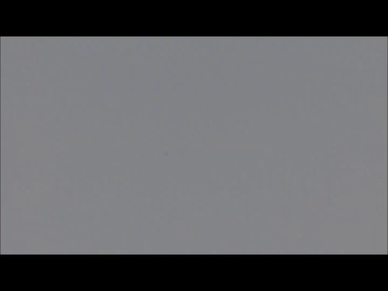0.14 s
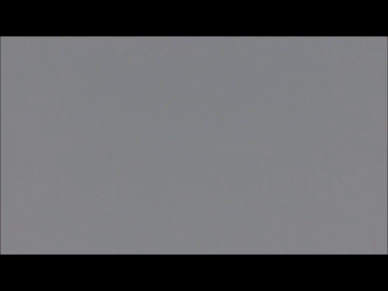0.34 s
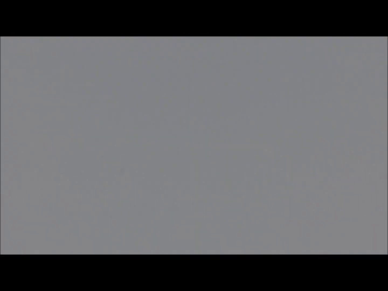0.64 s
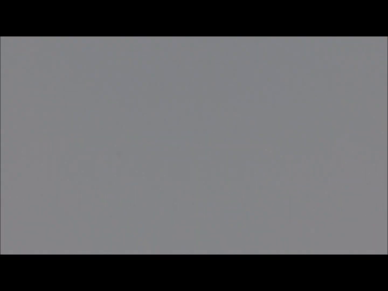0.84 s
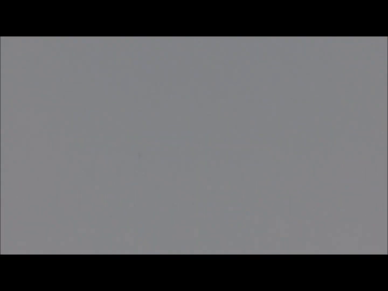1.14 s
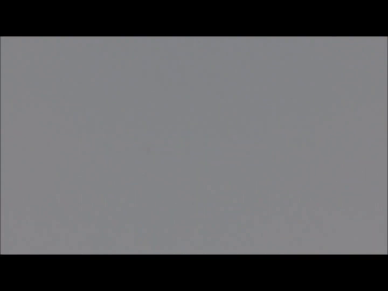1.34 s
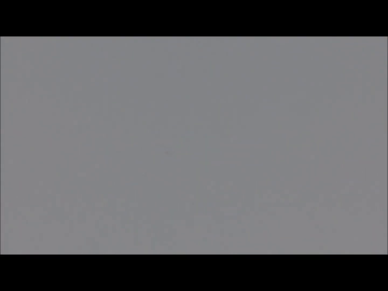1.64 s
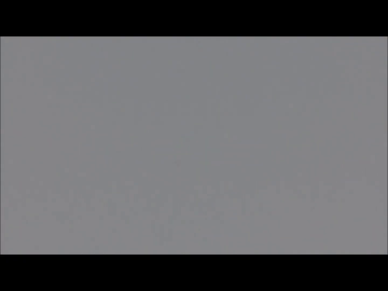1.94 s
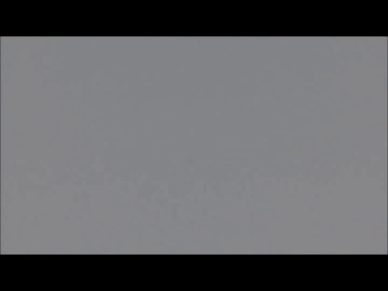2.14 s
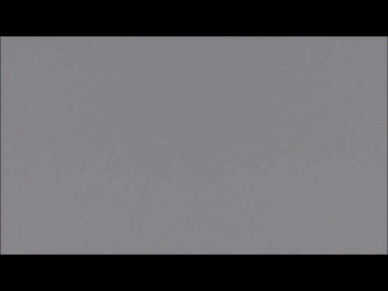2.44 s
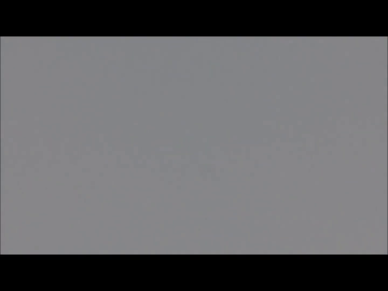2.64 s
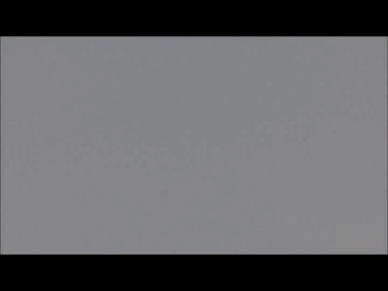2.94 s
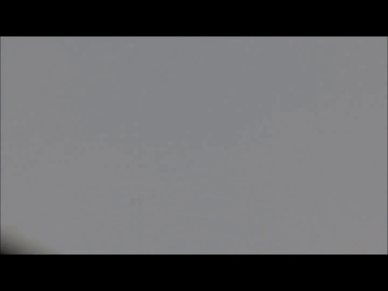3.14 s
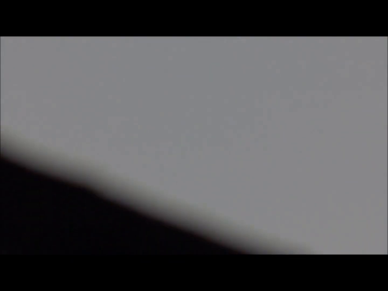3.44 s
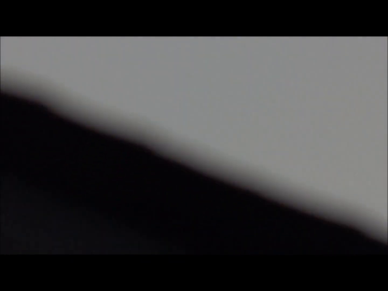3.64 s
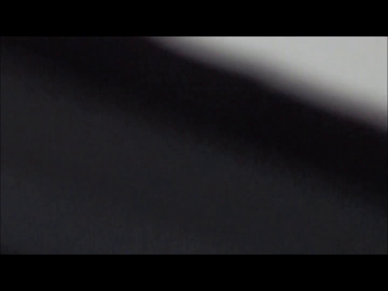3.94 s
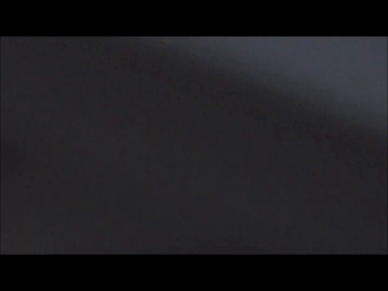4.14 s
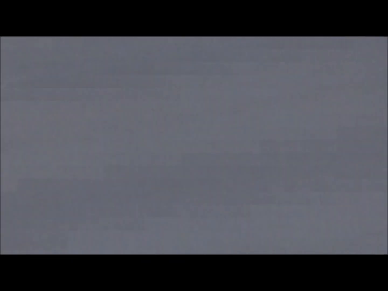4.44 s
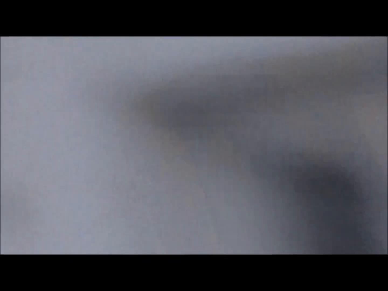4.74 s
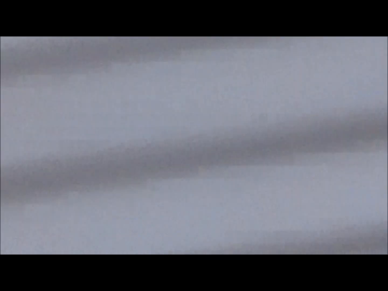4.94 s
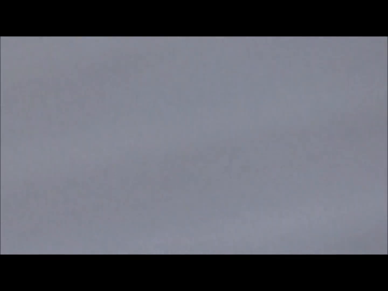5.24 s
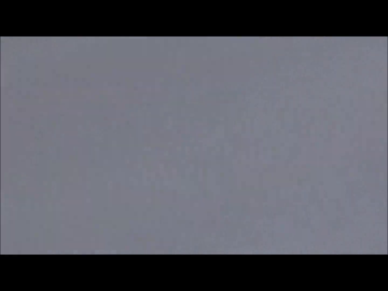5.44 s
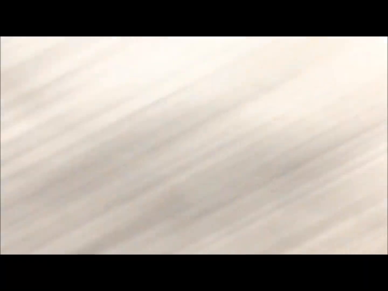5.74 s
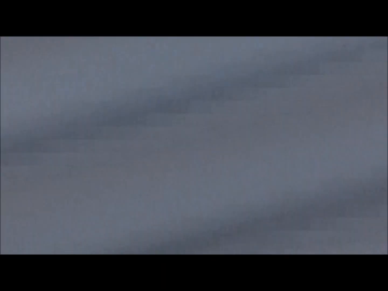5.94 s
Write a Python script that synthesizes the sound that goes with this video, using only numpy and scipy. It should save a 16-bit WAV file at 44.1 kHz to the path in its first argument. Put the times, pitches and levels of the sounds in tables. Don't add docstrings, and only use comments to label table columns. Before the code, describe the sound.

A close hand-held stereo microphone in open air picks up a strong wind gust and a smooth, wavering engine drone that gradually climbs with broad road noise. The roar brightens just before the engine suddenly drops out. Immediately the plastic casing cracks loudly, is knocked and rubbed by fingers; sparser clicks and dry scrapes continue over subdued rumble, a faint low hum and a slight closing gust.

```python
import sys
import numpy as np
from scipy import signal
from scipy.fft import rfft, irfft, next_fast_len
from scipy.io import wavfile

SR = 44100
rng = np.random.default_rng(int(sys.argv[2]) if len(sys.argv) > 2 else 0)


def output_pcm(signal):
    pcm = np.clip(np.atleast_2d(signal).T, -1, 1) * 32767
    wavfile.write(sys.argv[1], SR, np.round(pcm).astype(np.int16))


def attenuation_scalar(level_db):
    decades = np.asarray(level_db, float) / 20
    return 10 ** decades


N = 267863

# (frequency [Hz], likeness [0-1])
ROAD_LIKENESS = [(60, .99), (130, .97), (290, .88), (640, .66), (1410, .68), (3100, .8), (6820, .8),
                 (9500, .85), (11000, 1.0), (16000, 1.0)]


def rms_one(x):
    return x / np.sqrt(np.mean(x ** 2) + 1e-20)


def in_time(rows):
    s, *columns = np.transpose(rows)
    return [np.interp(np.arange(N) / SR, s, column) for column in columns]


def at_hz(points, hz):
    table_hz, values = np.array(points).T
    return np.interp(np.log(hz), np.log(table_hz + 1), values)


def swells(rows):
    t = np.arange(0, N + 40, 40) / SR
    total_db = sum(db * np.exp(-((t - s) / half) ** 2) for s, db, half in rows)
    return np.interp(np.arange(N) / SR, t, total_db)


def drift(rate):
    r = np.exp(-80 * np.pi * rate / SR)
    slow = signal.lfilter([1], [1, -2 * r, r * r], rng.standard_normal(N // 40 + 2002))[2000:]
    return np.interp(np.arange(N) / 40, np.arange(len(slow)), rms_one(slow))


def low_pass(x, hz):
    return signal.sosfilt(signal.butter(2, hz, fs=SR, output="sos"), x)


def ring(x, hz, t60):
    r, w = attenuation_scalar(-60 / (t60 * SR)), 2 * np.pi * hz / SR
    return signal.lfilter([0, np.sin(w)], [1, -2 * r * np.cos(w), r * r], x + 1e-18)


def resonant(x, bands, wander_db, lift_db=0):
    out = x
    for hz, t60, db in bands:
        gain = attenuation_scalar(db + lift_db + wander_db * drift(6.5))
        out = out + gain * rms_one(ring(ring(x, hz, t60), hz, t60))
    return out


def stereo(mid, side, alike):
    return np.sqrt(1 + alike) * mid + np.sqrt(1 - alike) * side * [[1], [-1]]


def banded_noise(spectrum, likeness, patchy_db, flicker):
    out, together = 0, drift(7.7)
    lowest, highest = spectrum[0][0], spectrum[-1][0]
    edges = lowest * 2 ** np.arange(0, np.log2(highest / lowest) + .3, 1 / 3)
    white = rng.standard_normal((2, 2, N))
    for k, (low, high) in enumerate(zip(edges, edges[1:])):
        hz = np.sqrt(low * high)
        level_db = at_hz(spectrum, hz)
        if level_db < -50:
            continue
        band = signal.butter(2, [low, high], "band", fs=SR, output="sos")
        mid, side = signal.sosfilt(band, white[k % 2])
        alike = np.clip(at_hz(likeness, hz), -1, 1)
        gain = attenuation_scalar(level_db + patchy_db * (.5 * together + drift(flicker)))
        out = out + gain * stereo(mid, side, alike)
    return rms_one(out)


def self_noise():
    high = signal.butter(2, 7000, "high", fs=SR, output="sos")
    return attenuation_scalar(-66) * rms_one(signal.sosfilt(high, rng.standard_normal(N)))


def road_rumble(open_db):
    # (frequency [Hz], level [dB per Hz])
    rumble_spectrum = [(12, -65.5), (20, -35.5), (38, -17.5), (70, 0), (145, 4), (177, 0.5), (223, -4),
                       (248, -9.5), (382, -17), (500, -31), (650, -57.5), (1100, -120)]
    # (time [s], rise [dB], half length [s])
    gusts = [
        (0, 11.5, 0.21),
        (.78, 1.5, 0.071),
        (2.2, 1, 0.28),
        (4.42, 3, 0.099),
        (5.5, 1.5, 0.14),
        (6.07, 5, 0.58),
    ]
    level_db = -27 + 0.72 * open_db + swells(gusts)
    return attenuation_scalar(level_db) * banded_noise(rumble_spectrum, ROAD_LIKENESS, patchy_db=1.0, flicker=6.0)


def road_roar(open_db, puffs):
    # (frequency [Hz], level [dB per Hz])
    roar_spectrum = [(190, -43.5), (330, 1), (359, -23), (417, -3), (538, -10), (580, -15), (733, -8),
                     (1010, -5.5), (1300, -14.5), (1660, -12.5), (2600, -20), (3150, -29), (4200, -26.5),
                     (5460, -52), (9240, -120)]
    # (frequency [Hz], 60 dB decay [s], level [dB])
    body_bands = [(740, .025, -9), (1680, .01, -9.5), (3000, .008, -15)]
    # (time [s], rise [dB], half length [s])
    flank_faces = [
        (3.55, 4, .4),
    ]
    roar = banded_noise(roar_spectrum, ROAD_LIKENESS, patchy_db=.8, flicker=3.0)
    roar = resonant(roar, body_bands, wander_db=-0.5, lift_db=swells(flank_faces))
    return attenuation_scalar(-33 + open_db) * puffs * roar


def road_hiss(open_db):
    # (frequency [Hz], level [dB per Hz])
    hiss_spectrum = [(1760, -39), (3000, 1.5), (3520, -12), (3910, -5), (4470, -6.5), (5630, -14),
                     (6670, -7), (10400, -26.5), (14200, -27.5), (16000, -42)]
    # (time [s], change [dB], half length [s])
    aim = [
        (.1, -5.5, 0.5),
        (3.05, -3.5, 0.4),
        (6.07, 5, 0.25),
    ]
    level_db = -50.2 + 0.76 * open_db + swells(aim)
    return attenuation_scalar(level_db) * banded_noise(hiss_spectrum, ROAD_LIKENESS, patchy_db=.5, flicker=2.5)


def swish(path):
    hz, level_db = in_time(path)
    slow = low_pass(rng.standard_normal((3, N)), 400)
    turn = 2 * np.pi * np.cumsum(hz) / SR
    mid = slow[0] * np.cos(turn) + slow[1] * np.sin(turn)
    side = slow[2] * np.cos(turn)
    return attenuation_scalar(level_db + 1.5 * drift(5.0)) * rms_one(mid + 0.53 * side * [[1], [-1]])


def ground_reflections():
    # (time [s], centre [Hz], level [dB])
    high_path = [(0, 6500, -62), (.8, 6500, -63), (1.0, 8500, -75), (1.3, 8200, -61.5), (1.6, 7300, -62.5),
                 (2.4, 6300, -63), (3.0, 6400, -68), (3.3, 4600, -52.5), (3.7, 4500, -47.5),
                 (4.05, 4400, -56), (4.3, 4280, -58.5), (5.7, 5600, -60.5), (5.85, 6200, -58),
                 (6.07, 6700, -53.5)]
    # (time [s], centre [Hz], level [dB])
    low_path = [
        (0, 3307, -70),
        (1.0, 4484, -67),
        (1.4, 4620, -60),
        (2.4, 4200, -61.5),
        (3.0, 3190, -57.5),
        (3.45, 3110, -47.5),
        (3.9, 3160, -51.5),
        (4.1, 3160, -57),
        (4.3, 3000, -72),
        (6.07, 3000, -78),
    ]
    return swish(high_path) + swish(low_path)


def coasting():
    # (time [s], frequency [Hz], level [dB])
    hum = [
        (4.65, 73.9, -38),
        (4.69, 77, -42.5),
        (5.016, 73.1, -29),
        (5.056, 68.8, -38.5),
        (5.256, 67, -37.5),
        (5.414, 63.7, -46),
        (5.45, 64, -55.5),
    ]
    hz, level_db = in_time([(4.1, 79.3, -73.5), *hum, (5.55, 64.3, -60.5)])
    phase = 2 * np.pi * np.cumsum(hz) / SR + 0.49 * drift(19.0)
    return np.sqrt(2) * attenuation_scalar(level_db + 0.64 * drift(8.0)) * np.sin(phase)


def bumps():
    # (time [s], level [dB])
    jolts = [
        (0.005, -3),
        (4.098, -3.5),
        (4.94, -8),
        (5.487, -9.5),
    ]
    pushes = np.zeros(N)
    for s, db in jolts:
        pushes[round(s * SR)] = attenuation_scalar(db - 17)
    return signal.lfilter([.02], [1, -.98], ring(pushes, 35, .09))


def rubbing():
    # (frequency [Hz], level [dB per Hz])
    rub_spectrum = [(500, -0.5), (800, 6), (1500, -2.5), (2600, -1), (3500, -9.5), (4500, -9.5),
                    (5800, -23.5), (7000, -13), (9000, -16.5), (10500, -26), (12700, -20), (14200, -30),
                    (15500, -33.5)]
    # (frequency [Hz], likeness [0-1])
    rub_likeness = [(500, 0.65), (1500, 0.51), (6000, 0.84), (9000, 0.68), (10500, 1), (16000, 0.79)]
    # (frequency [Hz], 60 dB decay [s], level [dB])
    shell_bands = [(2600, .006, -12), (5800, .006, -13), (8000, .005, -17), (9100, .005, -17),
                   (12700, .003, -30)]
    # (time [s], rise [dB], half length [s])
    dry_finger = [
        (4.275, 7, .03),
        (4.335, 9, .03),
        (4.735, 2, .03),
        (5.83, 4, .1),
    ]
    # (start [s], stop [s], level at the stop [dB])
    strokes = [(4.075, 4.09, -44), (4.1, 4.125, -52), (4.94, 4.975, -51), (4.165, 4.185, -45),
               (4.19, 4.215, -43), (4.222, 4.24, -45), (4.255, 4.3, -47), (4.3, 4.353, -49),
               (4.555, 4.563, -50), (4.58, 4.63, -55), (4.7, 4.76, -51), (4.86, 4.93, -49),
               (4.93, 4.998, -46), (5.29, 5.36, -47), (5.485, 5.51, -43), (5.61, 5.67, -48),
               (5.69, 5.85, -56), (5.87, 5.96, -50), (5.97, 6.06, -56)]
    press_db, land_db_per_s, lift_db_per_s = 3, 550, 1000
    t = np.arange(N) / SR
    level = np.zeros(N)
    for start, stop, db in strokes:
        still_to_go = np.clip((stop - t) / (stop - start + 1e-3), 0, 1)
        landing_db = land_db_per_s * np.maximum(start - t, 0)
        lifting_db = lift_db_per_s * np.maximum(t - stop, 0)
        level += attenuation_scalar(db - press_db * still_to_go - landing_db - lifting_db)
    grains = attenuation_scalar(2.6 * drift(400.0) + .4 * drift(35.0))
    skin = banded_noise(rub_spectrum, rub_likeness, patchy_db=.9, flicker=6.0)
    skin = resonant(skin, shell_bands, wander_db=1.5, lift_db=swells(dry_finger))
    return level * attenuation_scalar(6.0) * grains * skin


def peak_one(x):
    return x / np.abs(x).max()


def palm_knocks():
    # (time [s], peak [dB], pitch [Hz])
    knocks = [(4.0751, -22.5, 1190), (4.0986, -20.5, 623), (4.1621, -17, 595), (4.1904, -21.5, 980),
              (4.2038, -10.5, 663), (4.2248, -20, 910), (4.2604, -20.5, 578), (4.2954, -20.5, 749),
              (4.5534, -23.5, 576), (4.5645, -12.5, 613), (4.5655, -23.5, 1103), (5.4861, -13, 837),
              (5.5962, -23, 910), (5.9372, -31, 825)]
    out, t = np.zeros((2, N + 2000)), np.arange(2000) / SR
    for s, db, hz in knocks:
        burst = rng.standard_normal(len(t)) * attenuation_scalar(-60 * t / 0.025)
        body = ring(burst, hz, .035) + .6 * ring(burst, 1.3 * hz, .02)
        knock = ring(body, 1.1 * hz, .006)
        i = round(s * SR)
        out[:, i:i + len(t)] += attenuation_scalar(db - 4.5) * peak_one(knock)
    return out[:, :N]


def shell_snaps():
    # (frequency [Hz], level [dB], 60 dB decay [s], left-right likeness [0-1])
    edge_modes = [(5900, 0, .003, .85), (7600, -1, .0025, .6), (9200, -6, .0025, .5),
                  (11500, -12, .002, 1.0), (13500, -22, .002, 1.0)]
    # (time [s], peak [dB], pitch [Hz], crack [dB], bright edge [dB])
    snaps = [(4.053, -40.5, 1716, -37.5, -30), (4.0739, -15.5, 1774, -21, -15.5),
             (4.0802, -17.5, 3000, -29.5, -30.5), (4.0993, -4, 2020, -14.5, -0.5),
             (4.109, -26, 1510, -21, -9.5), (4.1392, -17, 2380, -35, -41), (4.1492, -32, 2004, -40, -33),
             (4.1628, -24, 1690, -30.5, -23.5), (4.1669, -26, 2430, -26.5, -29),
             (4.1886, -26, 2580, -36, -19.5), (4.1903, -20, 2600, -34, -26), (4.1948, -26, 1800, -44, -25),
             (4.2046, -21, 1770, -37, -37), (4.2256, -19, 1590, -31.5, -30),
             (4.4363, -14, 2510, -27.5, -21.5), (4.5545, -35, 1533, -42, -28),
             (4.5647, -11, 1880, -30, -40), (4.6049, -26.5, 2000, -36, -29),
             (4.6521, -15.5, 2310, -19.5, -33), (5.2613, -17.5, 2100, -22, -21.5),
             (5.2802, -23.5, 2704, -38, -31), (5.2885, -13, 2480, -20, -7.5), (5.3163, -21, 2730, -34, -45),
             (5.336, -35, 1900, -36, -18.5), (5.3524, -29, 1920, -33, -39), (5.3658, -25, 2000, -27, -24.5),
             (5.408, -24, 2280, -32, -19.5), (5.4867, -14, 2620, -21.5, -30),
             (5.5969, -22.5, 2400, -27, -29.5), (5.618, -15.5, 2780, -22, -37),
             (5.7258, -15.5, 1670, -30, -19.5), (5.8221, -29.5, 1690, -42, -22),
             (5.9366, -19.5, 2690, -23, -24.5)]
    # (time [s], level [dB])
    creaks = [
        (4.2598, -41.5),
        (5.3278, -57),
        (5.469, -44.5),
        (5.55, -51),
        (5.7485, -49.5),
        (5.927, -50),
        (5.9737, -40),
    ]
    crack_hz, crack_t60 = 4200, 0.0014
    out, t = np.zeros((2, N + 2000)), np.arange(2000) / SR
    creak_rows = [(s, db + 9.5, 3000, db + 9.5, db + 13) for s, db in creaks]
    for s, snap_db, snap_hz, crack_db, edge_db in [*snaps, *creak_rows]:
        mid, side = 0.55 * rng.standard_normal((2, len(t))) * attenuation_scalar(-60 * t / 0.02)
        mid[0], side[0] = 2, 1.5
        crack = ring(mid, crack_hz, crack_t60) - .7 * ring(mid, .8 * crack_hz, crack_t60)
        snap = ring(mid, snap_hz, .0035) + .35 * ring(mid, .7 * snap_hz, .004)
        snap = low_pass(snap, 1.6 * snap_hz)
        edge = 0
        for hz, db, t60, alike in edge_modes:
            pair = stereo(mid, side, np.clip(alike, 0, 1)) * attenuation_scalar(-60 * t / .014)
            edge = edge + attenuation_scalar(db + rng.normal(0, 2)) * ring(pair, hz, t60)
        edge = edge - low_pass(edge, 4000)
        click = attenuation_scalar(snap_db) * peak_one(snap) + attenuation_scalar(crack_db) * peak_one(crack)
        i = round(s * SR)
        out[:, i:i + len(t)] += click + attenuation_scalar(edge_db) * peak_one(edge)
    return out[:, :N]


def exhaust():
    # (time [s], firing rate [Hz], load as level of the firing tone [dB])
    revs = [(0, 97.95, -15.5), (.16, 89.99, -15.5), (.36, 82.24, -20), (.8, 83.96, -23), (1.1, 87.6, -17),
            (1.6, 91.7, -15), (2.1, 96.24, -12.5), (2.7, 100.6, -11), (3.4, 106.8, -12), (3.98, 109.4, -11),
            (4.09, 111, -16), (4.13, 108.5, -29.5), (4.65, 106, -34.5), (5.03, 94.06, -43.5),
            (5.37, 92.16, -39), (5.71, 86.77, -31.5), (5.9, 86.63, -32.5), (6.07, 87.2, -36)]
    # (time [s], change [dB], half length [s])
    first_fades = [(.09, -15, 0.026), (.22, -2.5, 0.033), (.34, -10, 0.11), (.72, -3, 0.039),
                   (1.2, -2, .12), (1.385, -9.5, 0.068), (1.47, -6, 0.062), (1.78, -10, 0.11),
                   (1.95, -2.5, 0.058), (2.325, -11, 0.065), (2.5, -7, 0.077), (2.99, -4.5, 0.058),
                   (3.2, -6, 0.14), (3.25, -4.5, .03), (3.62, -7, 0.19), (4.69, -12, 0.13),
                   (5.37, -11, 0.064)]
    # (time [s], change [dB], half length [s])
    second_fades = [(0, -20, 0.034), (.08, -9.5, 0.042), (.135, -12, 0.023), (.33, -28, 0.1),
                    (.5, -10.5, 0.061), (.72, -4, 0.11), (.885, -28, 0.02), (1.0, 2.5, .08),
                    (1.21, -6, 0.048), (1.42, -4.5, 0.13), (1.62, -5.5, .04), (1.98, -10, 0.078),
                    (2.3, -9, 0.17), (2.31, -8.5, 0.019), (2.545, -26.5, 0.03), (2.69, -13.5, 0.23),
                    (2.82, -6, 0.027), (2.99, -17.5, 0.05), (3.14, -6, 0.1), (3.56, -6.5, 0.092),
                    (4.0, -2.5, 0.085), (4.3, -15, 0.13), (5.15, 0.5, 0.18), (5.4, 5.5, 0.2),
                    (6.07, 9.5, 0.16)]
    # (multiple [x firing], time [s], change [dB], half length [s])
    upper_fades = [(2.5, 0.46, -11.5, 0.099), (2.5, 0.81, -18, 0.044), (2.5, 1, 3, 0.045),
                   (2.5, 0.56, -4.5, 0.042), (2.5, 1.44, -7.5, .08), (2.5, 2.1, -19, 0.033),
                   (2.5, 1.75, 4.5, .15), (2.5, 1.96, 4, 0.022), (2.5, 2.3, 5, 0.089),
                   (2.5, 2, -12.5, 0.027), (2.5, 3.1, -5.5, 0.26), (2.5, 1.7, 5, .05),
                   (2.5, 3.85, 9.5, 0.17), (3, 0.26, 12, 0.059), (3, 0.44, -15, 0.042), (3, .68, 6, .12),
                   (3, 0.96, -4, 0.046), (3, .96, 10, 0.053), (3, 1.2, -15, 0.043), (3, 3.2, 1.5, .04),
                   (3, 2.9, -9, 0.029), (3, 2.52, -4.5, .03), (3, 4.8, -13, 0.029), (3, 2.2, -10.5, 0.014),
                   (3, 3, -17.5, .025), (3, 4.4, -14.5, 0.03), (3, 3.78, 6, 0.044), (3, 3.87, -3, 0.031),
                   (3, 3.99, 7, 0.071), (3.5, 0.47, -8, 0.27), (3.5, 2.4, 4, .05), (3.5, 1.4, 7, 0.066),
                   (3.5, 1.5, -13.5, .03), (3.5, 2.8, 12.5, 0.19), (3.5, 1.96, -16.5, 0.02),
                   (3.5, 1.5, 10, .08), (4, 0.14, 24, 0.033), (4, .72, -19, 0.026), (4, .9, 1.5, 0.13),
                   (4, 1.02, -15, 0.025), (4, 1.9, 9, .06), (4, 3.8, 5.5, 0.034), (4, 3.4, 9, .04),
                   (4, 3.95, 8, 0.068), (5, 0.64, 8, 0.091), (5, 1.06, 10.5, 0.033), (5, 1.95, 1, 0.36),
                   (5, 2.75, -9.5, 0.23), (5, 3.48, 4, .05), (5, 3.68, -16, 0.033)]
    # (multiple [x firing], level [dB], resonance [Hz], half width [Hz], boom [dB])
    booms = [(2.5, -46.5, 220, 24, 21), (3, -36, 333, 14, 0), (3.5, -47, 300, 46, 8),
             (4, -44.5, 338, 15, 14), (5, -44.5, 535, 29, 4)]
    # (multiple [x firing], level [dB])
    weak_orders = [(.5, -3), (1.5, 4), (6, -6.5), (7, -10)]
    # (frequency [Hz], level [dB])
    tailpipe = [(40, -2.5), (150, -2.5), (300, -0.5), (450, -2), (540, -5), (660, -13.5), (780, 8)]

    firing_hz, load_db = in_time(revs)
    turn = 2 * np.pi * np.cumsum(firing_hz) / SR
    t = np.arange(N) / SR
    opening = 1 - (t - 0.068) / 0.33
    shutting = (t - 4.08) / 0.02
    shut_db = -15.5 * np.clip(np.maximum(shutting, opening), 0, 1)

    # multiple, level in dB, random shake in dB
    orders = [(1, load_db + swells(first_fades), .7), (2, load_db + 1.5 + swells(second_fades), .7)]
    for k, db, hz, width, boom_db in booms:
        boom = boom_db * np.exp(-((k * firing_hz - hz) / width) ** 2)
        fades = swells([row[1:] for row in upper_fades if row[0] == k])
        orders.append((k, db + shut_db + boom + fades, 2.2))
    for k, db in weak_orders:
        orders.append((k, -37.5 + shut_db + db + at_hz(tailpipe, k * firing_hz), 4.0))

    out = np.zeros(N)
    for k, level_db, shake_db in orders:
        phase = k * turn + (0.03 + 0.014 * k ** 2) * drift(10.2) + rng.uniform(0, 2 * np.pi)
        out += np.sqrt(2) * attenuation_scalar(level_db + shake_db * drift(13.0)) * np.sin(phase)
    return out, turn


def scene():
    # (time [s], level [dB])
    openness = [(0, -2.5), (.34, -2), (.76, -0.5), (1.25, 0.5), (2.23, 0.5), (2.6, 0), (3.1, 2.5),
                (3.3, 2.5), (3.6, 2), (3.96, 2.5), (4.07, 2.5), (4.22, -8), (4.34, -5.5), (4.9, -5.5),
                (5.15, -6.5), (5.48, -3), (6.07, -2.5)]
    open_db, = in_time(openness)
    engine, turn = exhaust()
    puffs = 1 + 0.1 * np.sin(turn)
    road = road_rumble(open_db) + road_roar(open_db, puffs) + road_hiss(open_db) + ground_reflections()
    hand = bumps() + rubbing() + palm_knocks() + shell_snaps()
    return self_noise() + road + coasting() + hand + engine


def roll_off(x):
    return signal.sosfilt(signal.butter(12, 16530, fs=SR, output="sos"), x)


def record(dry):
    # (frequency [Hz], phase [radians])
    left_lead = [(30, .1), (100, 0.36), (210, 0.52), (400, 0.68), (1500, 0.72), (2300, 0.3), (4000, .3),
                 (8500, 0.0)]
    # (frequency [Hz], difference [dB])
    left_balance = [(60, -.8), (250, -1.3), (500, -2), (1200, -3), (2400, -1.7), (4400, -1), (8000, .5),
                    (12000, 0)]
    size = next_fast_len(N + 2000)
    hz = np.arange(size // 2 + 1) * SR / size + 1
    rounded = dry / (1 + np.abs(dry / .95) ** 5) ** .2
    tilt = attenuation_scalar(at_hz(left_balance, hz) / 2) * np.exp(.5j * at_hz(left_lead, hz))
    top = 1 / np.sqrt(1 + (hz / 15300) ** 64)
    mix = irfft(rfft(rounded, size) * [tilt, 1 / tilt] * top, size)[:, :N]
    return roll_off(mix)


dry = scene()
out = record(dry)
output_pcm(out)
```